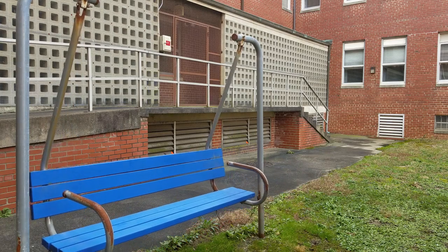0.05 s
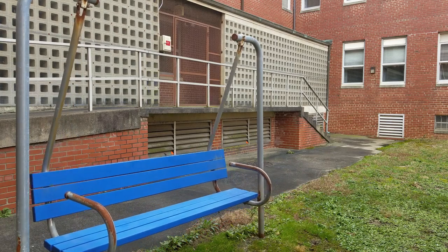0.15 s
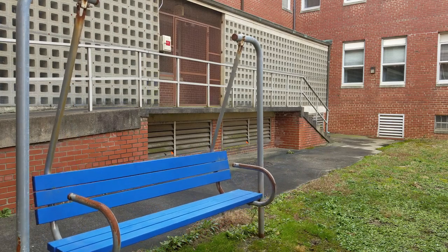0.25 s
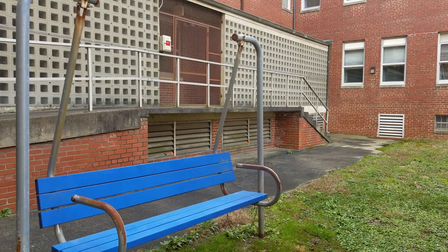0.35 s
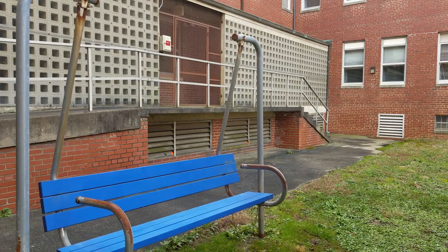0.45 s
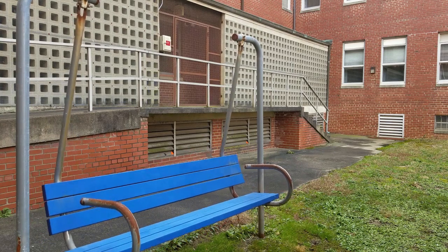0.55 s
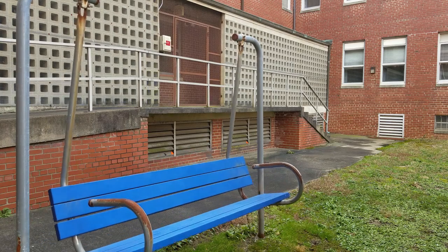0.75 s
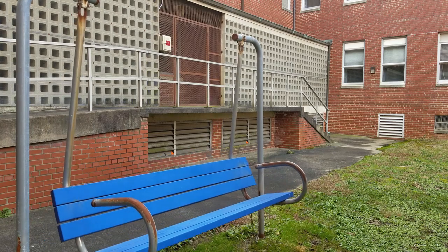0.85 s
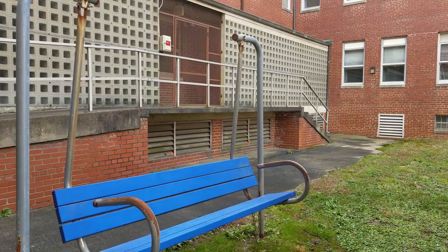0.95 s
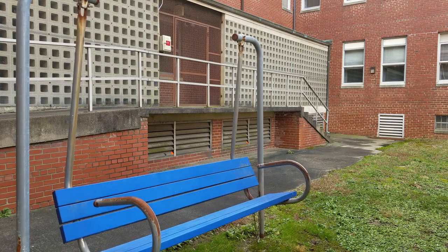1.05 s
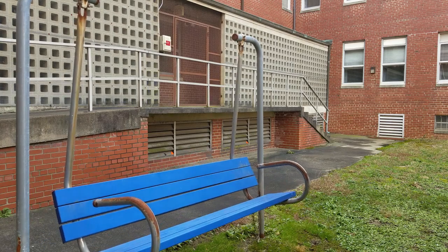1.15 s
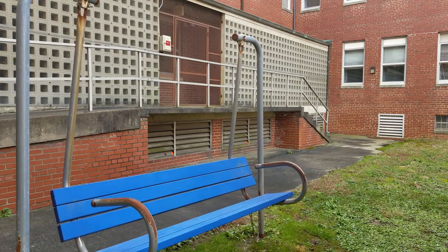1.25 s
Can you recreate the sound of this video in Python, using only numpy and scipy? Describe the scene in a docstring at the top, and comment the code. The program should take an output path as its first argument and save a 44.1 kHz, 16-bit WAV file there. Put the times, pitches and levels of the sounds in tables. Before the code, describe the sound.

A steel bench swing sways once, its dry hinge giving a soft squeak in two swells. Low rubbing, small metallic ticks and brief faint rustles follow, then fade into a quiet outdoor rumble.

```python
"""A steel bench swing sways once

The dry hinge sticks and slips, singing a soft note in two swells. The bearing rubs, groans low
and keeps the frame of steel tubes ringing faintly, with small metallic ticks along the way.
Brief rustles pass, then everything dies down into the quiet outdoor air."""
import sys
import numpy as np
from scipy import signal
from scipy.fft import rfft, irfft
from scipy.io import wavfile
from scipy.ndimage import uniform_filter1d

SR = 44100
rng = np.random.default_rng(int(sys.argv[2]) if len(sys.argv) > 2 else 0)


def inscribe(sig):
    """Save sig as 16-bit PCM at rate SR to the path in sys.argv[1].

    A 1-D sig is mono; a 2-D sig holds one channel per row.
    Samples are clipped to [-1, 1] before scaling.
    """
    pcm = np.round(np.clip(np.atleast_2d(sig).T, -1, 1) * 32767)
    wavfile.write(sys.argv[1], SR, pcm.astype(np.int16))


N = 57330  # 1.3 seconds
TIME_S = np.arange(N) / SR


# The path of the hinge's note: time_s, pitch_hz, level_db, left_minus_right_db
HINGE_NOTE = [(0.0, 953.0, -53.5, 14), (0.078, 941.7, -54.5, -6), (0.086, 951.0, -65.5, -9),
              (0.138, 940.4, -42, 0), (0.164, 936.5, -56.5, 9), (0.176, 936.4, -46, 7),
              (0.258, 941.8, -25, 0), (0.31, 941.9, -28.5, -2.5), (0.352, 938.7, -44, -11.5),
              (0.364, 936.1, -57, 23), (0.38, 940.7, -45.5, 3), (0.434, 941.8, -33, 5.5),
              (0.496, 941.7, -35, 2.5), (0.556, 940.4, -51.5, 12.5), (0.624, 941.7, -52, 18),
              (0.662, 941.4, -49.5, 2), (0.796, 942.6, -63.5, 23), (0.85, 940.4, -50, 9)]

def hinge_note(waver=0.13, waver_hz=40, left_phase_rad=-0.32):
    """The hinge sticks and slips in step with one vibration of the frame, making a nearly pure note."""
    hz, db, pan_db = (curve(HINGE_NOTE, column) for column in (1, 2, 3))
    side = np.array([[.5], [-.5]])
    ears = amp(side * pan_db) * np.exp(1j * side * left_phase_rad)
    fade_out = np.clip((HINGE_NOTE[-1][0] - TIME_S) / .05, 0, 1)
    note = np.exp(2j * np.pi * np.cumsum(hz) / SR) * (1 + waver * drift(waver_hz))
    return np.sqrt(2) * amp(db) * fade_out * (note * ears / abs(ears.mean(0))).real


# How the rub swells, before each part's gain: time_s, body_db, mids_db
RUB_SWELL = [(0.0, -53, -57), (0.082, -51.5, -60), (0.132, -66.5, -61), (0.148, -54.5, -61),
             (0.27, -59.5, -60.5), (0.296, -52, -64), (0.35, -51.5, -55), (0.764, -51.5, -59.5),
             (0.828, -52, -54.5), (0.864, -51.5, -56.5), (1.18, -62, -69), (1.3, -60, -69.5)]
# How the hiss swells: time_s, level_db
HISS_SWELL = [(0, -70.5), (.09, -70.5), (.19, -64.5), (.24, -67), (.3, -62.5), (.6, -66), (.81, -57.5),
              (.9, -62), (1.03, -62), (1.13, -69), (1.3, -66.5)]
# Tone colours of the rub's low body, its middle range and its hiss: frequency_hz, relative_db
BODY_COLOUR = [(100, -28), (250, -21.5), (370, -11), (440, -5), (520, -2.5), (660, -11.5), (830, -2),
               (1000, -11.5), (1300, -29.5), (3000, -54)]
MIDS_COLOUR = [(400, -32), (950, -10.5), (1150, 2.5), (1400, -3.5), (1700, -1.5), (2650, -5.5), (3400, -14),
               (5000, -21.5), (16000, -63.5)]
HISS_COLOUR = [(1500, -27.5), (3500, -4), (5500, -6.5), (7800, -2), (8900, -16), (10200, -9), (12000, -2),
               (15500, -4.5)]

def rubbing(body_gain_db=-2, mids_gain_db=2.5):
    """Friction in the bearing makes a hollow rub with a fine hiss on top."""
    body = noise(BODY_COLOUR) * amp(body_gain_db + curve(RUB_SWELL, 1))
    mids = weak_resonances(noise(MIDS_COLOUR)) * amp(mids_gain_db + curve(RUB_SWELL, 2))
    hiss = noise(HISS_COLOUR) * amp(curve(HISS_SWELL))
    return body + mids + hiss


# The frame's ringing notes: pitch_hz, relative_to_rub_db, jolt_level_db
FRAME_NOTES = [(272.7, -20, -69), (369.4, -17.5, -65), (402, -24, -64), (486.8, -13, -76),
               (521.3, -13, -77), (578.5, -19.5, -67), (614, -21, -58.5), (672.5, -20.5, -60),
               (762, -11.5, -59), (817.5, -15, -91), (894.5, -16, -90), (1130, -17.5, -65),
               (1153, -19.5, -58), (1284, -30.5, -62), (1688, -18, -90), (2240, -33, -98), (2612, -20, -73)]

def frame_ring(jolt_s=0.786, rise_s=0.027, fall_db_per_s=39.5):
    """The frame hums along with the rubbing and rings on after a jolt as the swing turns."""
    t = TIME_S - jolt_s
    rub = amp(curve(RUB_SWELL, 1))
    jolt = np.clip(1 + t / rise_s, 0, 1) * amp(-fall_db_per_s * np.maximum(t, 0))
    return sum(tube_note(hz) * np.hypot(amp(rub_db) * rub, amp(jolt_db) * jolt)
               for hz, rub_db, jolt_db in FRAME_NOTES)


# The path of the bearing's groan: time_s, pitch_hz, level_db
GROAN_PATH = [(.12, 550, -72), (.19, 548, -59), (.255, 545, -70), (.295, 558, -50), (.325, 575, -55),
              (.35, 527, -54), (.44, 527, -57), (.5, 533, -52), (.55, 562, -60), (.66, 545, -60),
              (.79, 558, -55), (.805, 505, -58), (.83, 492, -52), (.89, 495, -65), (1.0, 510, -74)]

def groan(roughness=.8, roughness_hz=30):
    """A rough, low tone slides and swells with the load on the bearing."""
    hz, db = curve(GROAN_PATH, 1), curve(GROAN_PATH, 2)
    tone = (1 + roughness * drift(roughness_hz)[0]) * np.exp(2j * np.pi * np.cumsum(hz) / SR)
    return amp(db) * evened((tone * from_left(hz)).real)


# The hinge's ticks: start_s, level_db, pitch_hz, time_to_fall_60_db_s, click_vs_ring_db, width_hz
HINGE_TICKS = [(.024, -67, 7600, .18, -14, 60), (.121, -56, 8150, .034, -10, 200),
               (.166, -48.5, 7564, 0.15, -6.5, 70), (.166, -58.5, 10740, 0.15, -7, 301),
               (.265, -54, 12100, 0.08, -2.5, 600), (.293, -55.5, 7700, 0.065, -9, 150),
               (.33, -58.5, 7880, 0.097, -11, 250), (.416, -55, 11750, 0.13, -3, 700),
               (.579, -69, 7150, .13, -15, 40), (0.757, -50, 8070, .036, -4, 248),
               (.774, -55.5, 7090, 0.45, -12, 35), (.776, -60, 7640, 0.22, -12, 80),
               (.776, -53, 12050, 0.048, -5, 150), (0.818, -47, 7085, 0.14, -14, 30),
               (0.82, -47, 7660, 0.1, -10, 110), (0.819, -47.5, 14680, 0.05, -12, 90),
               (1.175, -70, 7090, 0.32, -10, 40)]
# Tone colour of the click: frequency_hz, relative_db
CLICK_COLOUR = [(2000, -18), (5500, -5), (7500, 0.5), (9500, -7), (11500, 4.5), (15500, -1)]

def ticks(rise_s=0.0024, click_fall_s=.004, pure_below_hz=75):
    """Each tiny slip in the hinge gives a click and a thin ring; wider rings sound grittier."""
    out, click_noise = np.zeros((2, N)), noise(CLICK_COLOUR)
    for start_s, db, hz, ring_s, click_db, width_hz in HINGE_TICKS:
        t = np.maximum(TIME_S - start_s, 0)
        tone = evened((pure_below_hz / width_hz + drift(width_hz)) * np.exp(2j * np.pi * hz * t)).real
        ring = tone * np.minimum(t / rise_s, 1) * amp(-60 * t / ring_s)
        click = amp(click_db) * click_noise * (t > 0) * np.exp(-t / click_fall_s)
        out += amp(db) * (ring + click)
    return out


# The bearing's scrapes: start_s, level_db, hold_s, pitch_hz, width_hz
BEARING_RASPS = [(.172, -63.5, .06, 2430, 150), (.266, -59.5, .018, 4130, 320),
                 (.272, -57.5, .022, 2320, 120), (.284, -59, .05, 2800, 260), (.297, -61, .03, 4100, 340),
                 (.412, -58, .012, 1850, 220), (.77, -56, .08, 768, 14), (.775, -59.5, .085, 1680, 30),
                 (.785, -55.5, .04, 1140, 14), (.815, -63, .025, 5200, 900)]

def rasps(rise_s=.003, fall_s=.012):
    """Short, rough scrapes each stir one ringing pitch of the dry bearing."""
    out = np.zeros((2, N))
    for start_s, db, hold_s, hz, width_hz in BEARING_RASPS:
        t = TIME_S - start_s
        swell = np.clip(t / rise_s, 0, 1) * np.exp(-np.maximum(t - hold_s, 0) / fall_s)
        grit = drift(width_hz)
        scrape = grit / np.sqrt(abs(grit)) * np.exp(2j * np.pi * hz * TIME_S)
        out += amp(db) * swell * evened(scrape.real)
    return out


# The hanger rod's ringing notes: pitch_hz, relative_db, fall_db_per_s
ROD_NOTES = [(484.5, 3, 18), (781, -2, 40), (1114, -6, 60), (1565, 1, 45), (1690, -5, 22), (1905, 0, 65),
             (2089, -12, 10), (2519, -16, 30)]

def hanger_rod(level_db=-60, waver=.35, waver_hz=12):
    """The rod that holds the bench is still ringing as the swing sets off; it wavers and dies away."""
    out = np.zeros((2, N))
    for hz, db, fall_db_per_s in ROD_NOTES:
        tone = (1 + waver * drift(waver_hz)) * np.exp(2j * np.pi * (hz * TIME_S + rng.random()))
        out += evened(tone.real) * amp(level_db + db - fall_db_per_s * TIME_S)
    return out


# Tone colour of the knock: frequency_hz, relative_db
KNOCK_COLOUR = [(1500, 1), (2600, 1), (3300, 4), (4600, -13), (5600, -17), (6700, -0.5), (7800, -23),
                (12000, -30)]

def knock(level_db=-52):
    """The hinge takes up its slack with one short, dry knock."""
    return noise(KNOCK_COLOUR) * amp(level_db) * burst(peak_s=0.0205, rise_s=0.0024, fall_s=0.0038)


# The passing rustles: peak_s, level_db, rise_s, fall_s, brightness_db_per_octave
RUSTLE_EVENTS = [(.692, -50.5, .013, .036, 2.5), (.762, -59, .004, .06, 1.5), (.948, -54.5, .03, .022, 9),
                 (1.015, -65, .012, .02, 9)]
# Their shared tone colour: frequency_hz, relative_db
RUSTLE_COLOUR = [(1500, -1), (3500, 4.5), (6200, 5), (8000, 1), (9700, -14), (11500, -3), (15500, 0)]

def rustles(grain_db=1.5, grain_hz=200, pivot_hz=8000):
    """Short, bright brushes of noise, made grainy by a fast flicker in level."""
    out = np.zeros((2, N))
    for peak_s, db, rise_s, fall_s, brightness in RUSTLE_EVENTS:
        colour = [(hz, level + brightness * np.log2(hz / pivot_hz)) for hz, level in RUSTLE_COLOUR]
        out += noise(colour) * amp(db) * burst(peak_s, rise_s, fall_s)
    return out * evened(amp(grain_db * drift(grain_hz)[0].real))


# Tone colour of the outdoor air: frequency_hz, relative_db
AIR_COLOUR = [(20, -10), (40, 0), (60, 2.5), (95, 4.5), (130, -4.5), (180, 0.5), (300, -1.5), (700, -9.5),
              (2000, -30.5), (6000, -29.5)]
# How it swells: time_s, level_db
AIR_SWELL = [(0, -64), (.13, -64), (.19, -59), (.25, -62.5), (.38, -66), (.44, -62.5), (.47, -64),
             (.52, -59.5), (.56, -66.5), (.8, -65), (.95, -65.5), (1.3, -67.5)]

def outdoor_air(width=0.33):
    """A low rumble swells slightly; more width makes it less alike in the two ears."""
    separate = np.array([noise(AIR_COLOUR)[0], noise(AIR_COLOUR)[1]])
    return amp(curve(AIR_SWELL)) * evened((1 - width) * noise(AIR_COLOUR) + width * separate)


# How alike the two ears are: frequency_hz, likeness (0 to 1)
EAR_LIKENESS = [(30, 0.11), (100, 1), (300, 0.82), (600, 1), (1200, 0.29), (3000, 0.11), (7000, 0.23),
                (15000, 0.45)]
# How much louder the left ear is: frequency_hz, left_minus_right_db
EAR_BALANCE = [(60, 1), (180, 3), (550, 3), (1650, 2.5), (4970, 2), (15000, 0.5)]

def noise(colour):
    """Stereo noise of a given tone colour, partly alike in both ears."""
    hz = np.fft.rfftfreq(N, 1 / SR)
    shared, separate = rfft(rng.standard_normal((2, N)))
    alike, lean = look_up(EAR_LIKENESS, hz), amp(look_up(EAR_BALANCE, hz) / 2)
    ears = np.array([shared * lean, (alike * shared + np.sqrt(1 - alike ** 2) * separate) / lean])
    return evened(irfft(ears * from_left(hz) * amp(look_up(colour, hz)), N))


def tube_note(hz, width_hz=7.4):
    """One wavering note of a steel tube, partly alike in both ears."""
    shared, separate = drift(width_hz)
    alike, lean = look_up(EAR_LIKENESS, hz), amp(look_up(EAR_BALANCE, hz))
    ears = np.array([shared * lean, alike * shared + np.sqrt(1 - alike ** 2) * separate])
    waver = ears / np.sqrt(abs(ears))  # softens the swings in level and the lean to the left
    return evened((waver * from_left(hz) * np.exp(2j * np.pi * hz * TIME_S)).real)


def weak_resonances(sound, depth_db=2.5, width_hz=22):
    """Many weak resonances colour a sound with narrow peaks and dips."""
    size = int(width_hz * N / SR)
    bumps = uniform_filter1d(rng.standard_normal(N // 2 + 1), size)
    ripple = evened(uniform_filter1d(bumps, size // 2))
    return evened(irfft(rfft(sound) * amp(depth_db * ripple), N))


def from_left(hz, lead_s=0.00014):
    """Phase shifts that let a sound reach the left ear a moment before the right."""
    return np.exp(1j * np.pi * hz * lead_s * np.array([[1], [-1]]))


def drift(width_hz):
    """A random wobble of level and phase for each ear; wider means faster."""
    white = rng.standard_normal((2, 2, N))
    smooth = irfft(rfft(white) / (1 + (np.fft.rfftfreq(N, 1 / SR) / width_hz) ** 2), N)
    return evened(smooth[0] + 1j * smooth[1])


def burst(peak_s, rise_s, fall_s):
    """A level that rises smoothly to a peak, then dies away."""
    t = TIME_S - peak_s
    return np.exp(-(np.minimum(t, 0) / rise_s) ** 2 - np.maximum(t, 0) / fall_s)


def curve(table, column=1):
    """Joins the points of a time table with straight lines."""
    rows = np.array(table)
    return np.interp(TIME_S, rows[:, 0], rows[:, column])


def look_up(table, hz):
    """Reads a frequency table between its points, on a scale of octaves."""
    table_hz, values = np.transpose(table)
    return np.interp(np.log(hz + 1), np.log(table_hz + 1), values)


def amp(db):
    """Turns decibels into a multiplier."""
    return 10 ** (np.asarray(db) / 20)


def evened(x):
    """Scales a signal to an average power of 1."""
    return x / np.sqrt(np.mean(abs(x) ** 2) + 1e-20)


def scene():
    """The swing and the rustles over the low outdoor air."""
    swing = hinge_note() + hanger_rod() + frame_ring() + rubbing() + groan() + rasps()
    return swing + rustles() + knock() + ticks() + outdoor_air()


def record(dry):
    """Cuts the highest treble, above 15900 Hz."""
    low_pass = signal.firwin(511, 15900, window=("kaiser", 9), fs=SR)
    return signal.oaconvolve(dry, low_pass[None], "same")


dry = scene()
out = record(dry)
inscribe(out)
```